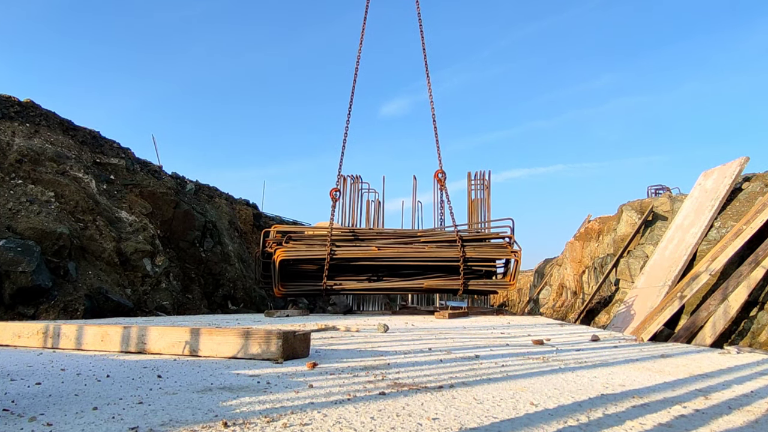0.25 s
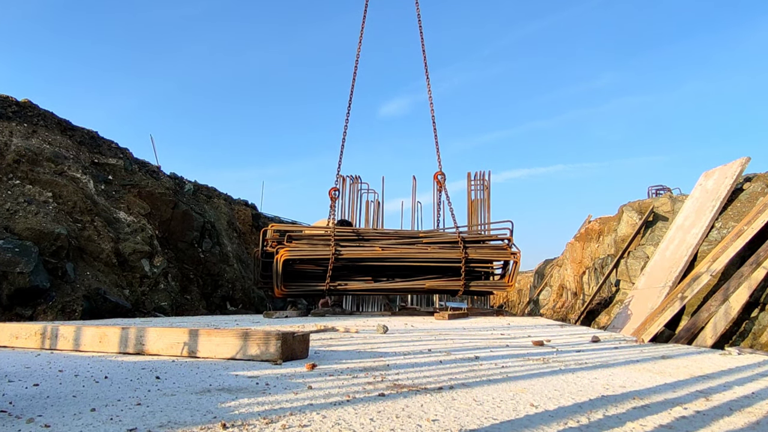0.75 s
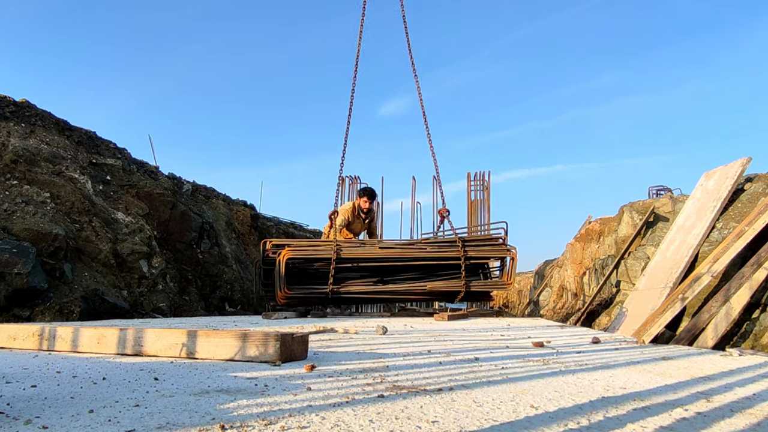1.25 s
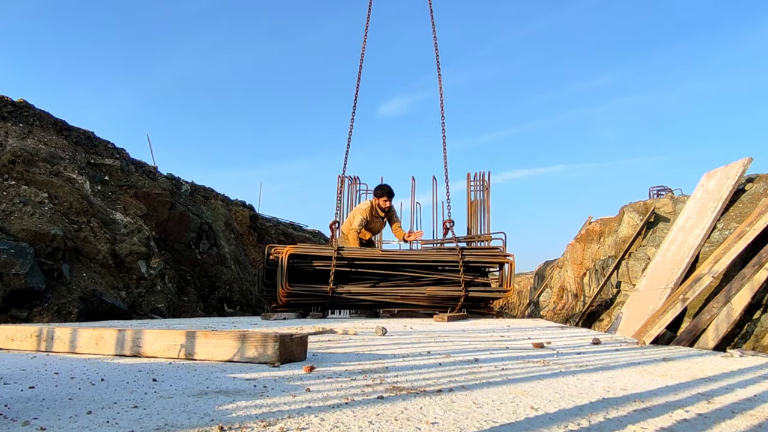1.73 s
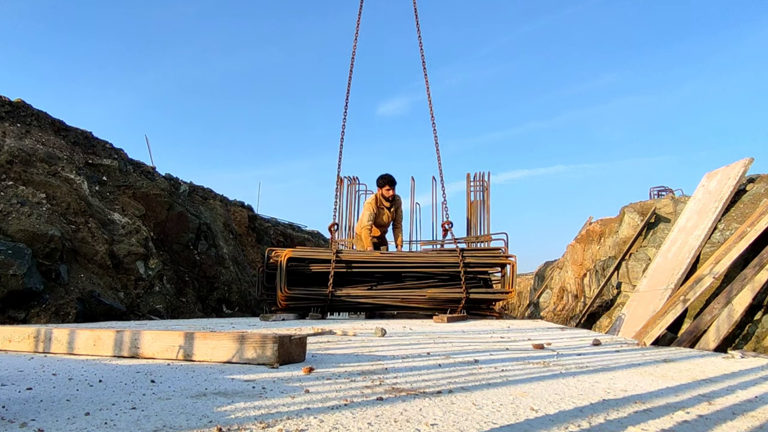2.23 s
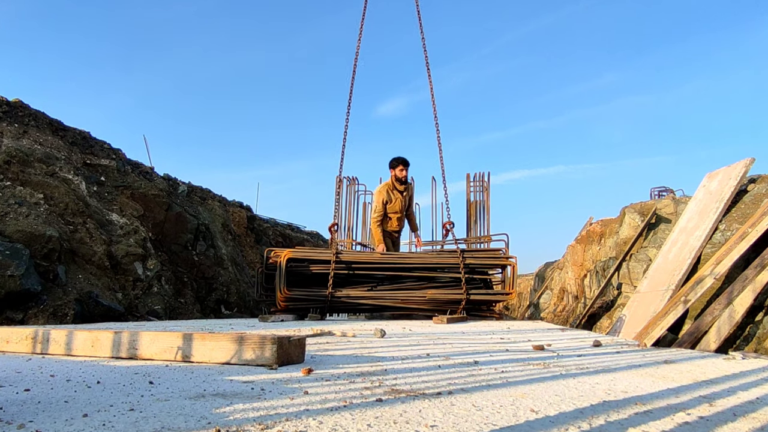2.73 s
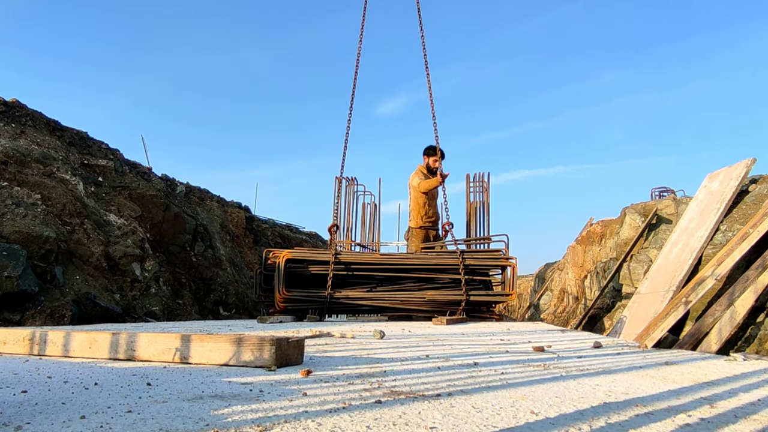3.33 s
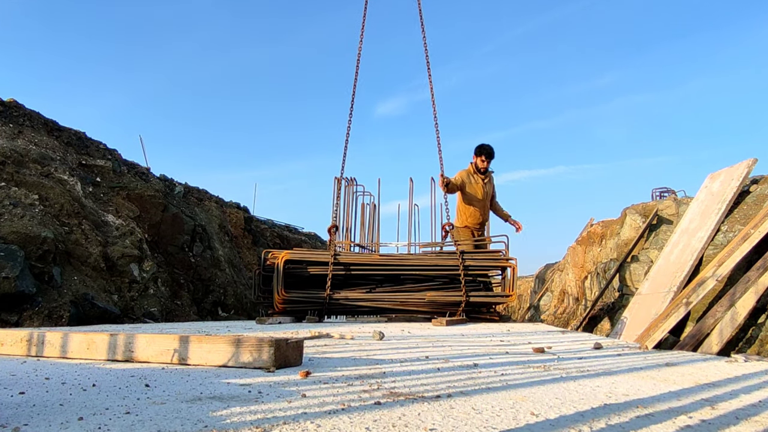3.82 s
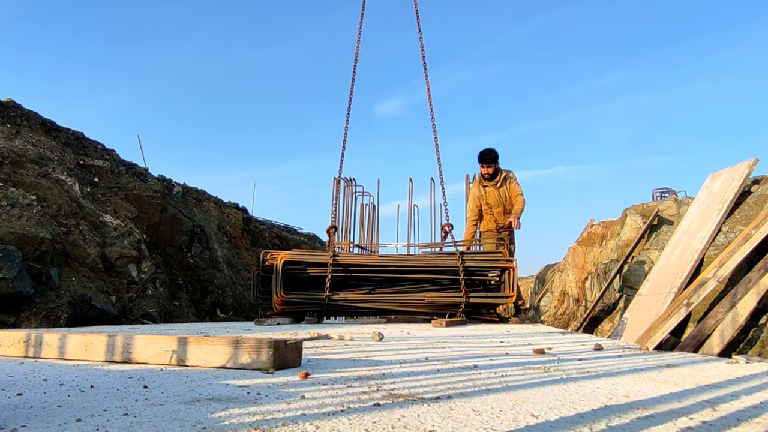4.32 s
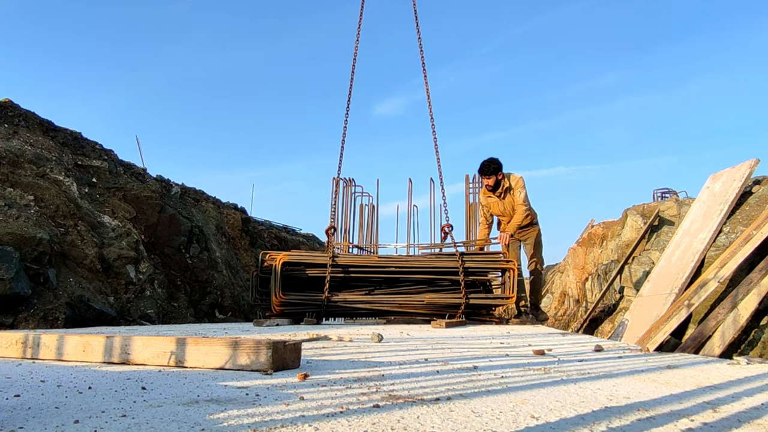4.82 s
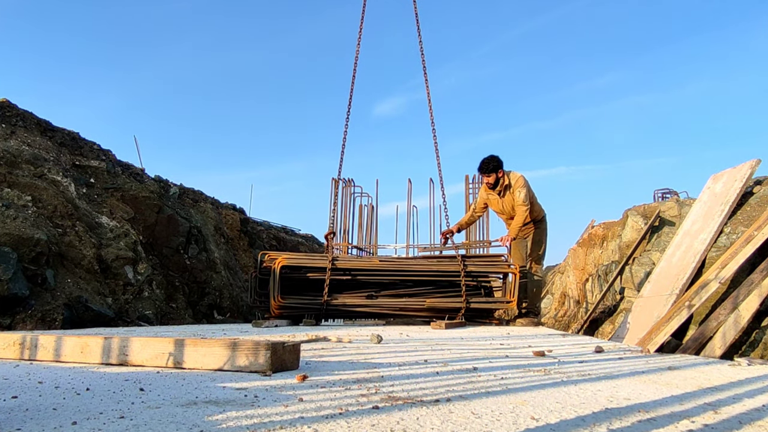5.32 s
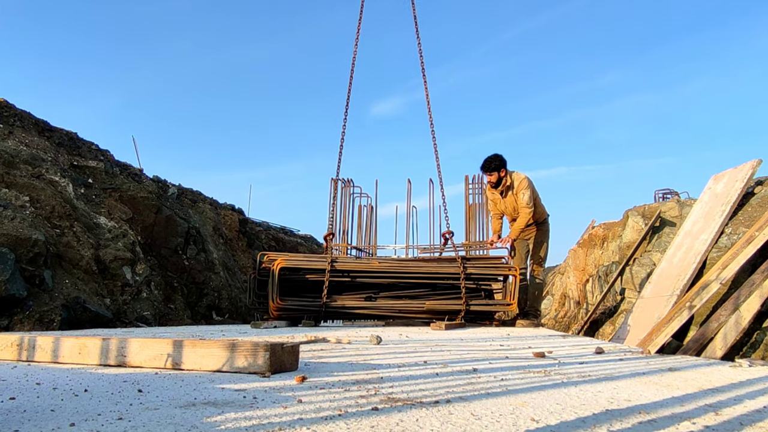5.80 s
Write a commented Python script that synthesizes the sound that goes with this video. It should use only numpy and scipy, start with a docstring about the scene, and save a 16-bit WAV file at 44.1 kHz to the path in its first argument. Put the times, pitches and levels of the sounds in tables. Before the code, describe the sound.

Open construction site, heard in stereo from a short distance: diesels idle low, slightly left, over a soft wash. A few faint chain clinks, then a load of steel bars clatters down for about a second, loud, bright and ringing, with dull wooden knocks beneath and a low puff bumping the microphone. Slack chains clink and slide sparsely, a far hammer tocks regularly, an engine revs briefly, and a few duller steel knocks close it.

```python
"""A bundle of reinforcing bars, set down by crane on a concrete slab ahead of the microphones: struck and
rattling steel is dense noise-like ringing with clear pings; timber bearers knock under it as damped sines.
The slack lifting chains clink and slide as they are handled, in link modes and random light touches.
Slightly left, two diesels idle and a third revs, as exhaust harmonics over a wash of coloured noise.
Far off someone hammers a board; a puff of air bumps the microphone as the load lands."""
import sys
import numpy as np
from scipy import signal
from scipy.fft import rfft, irfft
from scipy.io import wavfile
from scipy.ndimage import uniform_filter1d

SR = 44100
rng = np.random.default_rng(int(sys.argv[2]) if len(sys.argv) > 2 else 0)


def int16_out(signal):
    """Quantize to a 16-bit WAV file."""
    q = np.round(np.clip(np.atleast_2d(signal).T, -1, 1) * 32767)
    wavfile.write(sys.argv[1], SR, q.astype(np.int16))


N = 266937
T = np.arange(N) / SR

# how hard the bars rattle while the weight comes off the chains: (time [s], level [dB])
RATTLE_CURVE = [(1.1, -22), (1.118, -19), (1.195, -26), (1.235, -25.5), (1.27, -22), (1.31, -21.5),
                (1.42, -18.5), (1.468, -21.5), (1.5, -18.5), (1.58, -18.5), (1.68, -21.5), (1.73, -31),
                (1.825, -29.5), (1.885, -23.5), (1.988, -39.5), (2.02, -24.5), (2.05, -30.5),
                (2.085, -28.5), (2.2, -38)]
# heavy blows on the bars, from other bars or a falling chain: (time [s], nominal level [dB], crash t60 [s],
# hardness [dB], left-right difference [dB], relative body [dB], ping pitch [Hz])
SLAMS = [(1.084, -34, 0.12, 1, -2, 9, 8400), (1.101, -19, 0.07, 11.5, 2, -1, 5260),
         (1.1121, -8, 0.081, -1, 0, -2, 6670), (1.1325, -12, 0.065, 2.5, 0, 5, 6460),
         (1.146, -12, 0.13, 0.5, 0.5, 1, 6370), (1.214, -23, 0.089, -5, -2, 0, 7350),
         (1.246, -18, 0.13, 0, 0, -1.5, 6960), (1.269, -16.5, .1, 1, 2, 2.5, 4500),
         (1.294, -8.5, 0.1, -4, 3, -6, 6400), (1.304, -7, 0.067, -2, 0, -3, 7570),
         (1.349, -15, 0.078, -2, 0, -10, 6600), (1.3843, -10.5, 0.088, -1, -1, -8.5, 6260),
         (1.395, -15, .07, -9, 2, -3, 6960), (1.405, -15.5, 0.11, 3, -1, 11, 3940),
         (1.437, -15.5, 0.18, -10, -6, 3.5, 6740), (1.4753, -15, 0.096, 3, -4, -11, 7100),
         (1.499, -13.5, .09, 0.5, 0, 5.5, 2460), (1.5214, -12.5, 0.095, 3, -1.5, 1.5, 6900),
         (1.529, -10, 0.17, 4, -4.5, 2.5, 4430), (1.551, -13, 0.18, -10.5, 0, 7.5, 5200),
         (1.578, -10.5, 0.12, -5.5, -2.5, 4, 7000), (1.608, -10, 0.12, -3, -3, -0.5, 7340),
         (1.6203, -6, 0.19, -4.5, -2, -0.5, 7300), (1.6385, -7, 0.062, -2, -0.5, 4, 4830),
         (1.646, -14, 0.067, 5, 2, 4, 7350), (1.673, -7, 0.09, 4.5, -3.5, -6, 7360),
         (1.6826, -10, 0.039, 5, -1, -1, 7460), (1.739, -20, .07, -1, 0, -4.5, 6300),
         (1.76, -20.5, .04, -3, -7, -6, 7200), (1.837, -16.5, 0.076, -5.5, 2.5, -0.5, 7600),
         (1.868, -20, 0.035, -1.5, 2, -1.5, 6500), (1.884, -8.5, 0.093, 7.5, 0.5, -3, 6900),
         (2.0002, -8.5, 0.083, -1.5, 0.5, -2, 6170), (2.064, -24.5, .16, 6, -1, 2, 7800),
         (5.47, -27.5, 0.16, -7, 0, 4.5, 3680), (5.4923, -28.5, 0.24, -10, 0, 4, 4440),
         (5.517, -15.5, 0.13, -3, 0.5, 0, 6140), (5.5647, -23, 0.089, -1, 0, 4, 6900),
         (5.817, -26, 0.15, -12, -1, 0, 3920), (5.853, -28, 0.17, -4, 0, 0, 6160)]
# single chain links knocking on each other: (time [s], nominal level [dB], crash t60 [s], hardness [dB],
# ping pitch [Hz], ping above that level [dB])
CLINKS = [(0.0553, -45, 0.074, 5, 7840, -8), (0.116, -40, 0.026, 10, 8570, 1),
          (.4283, -55, .08, 12, 5000, -12), (2.168, -36, .04, 0, 6000, -8),
          (2.1861, -27.5, 0.025, 0, 8730, 6), (2.216, -30, 0.064, -5, 7150, -11),
          (2.2845, -34, 0.048, 9, 7030, -6), (2.308, -32, 0.093, -2, 5450, -11),
          (2.3285, -26.5, 0.075, 8.5, 7670, -5), (2.5116, -38.5, 0.088, 5, 5800, -6),
          (2.534, -37.5, 0.09, 7, 8640, -7), (2.575, -39.5, .1, 13, 8650, -1),
          (2.603, -32.5, 0.13, -5, 3300, -11), (2.83, -26.5, 0.067, 3, 5640, 1),
          (2.878, -27.5, .1, -14, 4900, -13), (2.963, -50, 0.072, -8, 5700, 6),
          (3.075, -47, .025, 2, 8500, -5), (3.0907, -38.5, .04, 5, 8550, -8),
          (3.134, -40, .03, 8, 8600, -2), (3.145, -40, 0.13, 9, 8530, 6), (3.214, -35.5, 0.11, 4, 6600, -6),
          (3.253, -34, 0.1, 2, 5650, -3.5), (3.3242, -35.5, 0.097, 8, 8600, 1),
          (3.3696, -42.5, 0.091, 7, 5660, -0.5), (3.459, -47.5, .08, -4, 7070, -3),
          (3.5813, -33, .06, -15, 6730, -2), (3.5976, -34, .06, -14, 5750, -7),
          (3.611, -29, 0.071, -14, 6300, -7), (3.7783, -49, 0.13, -10, 5140, -12),
          (3.8985, -48, .035, 6, 5670, -7), (3.991, -44, .06, -3, 6600, 0), (4.011, -44, .06, 0, 6100, 0),
          (4.046, -37, 0.085, -7, 7560, -6), (4.181, -44, 0.09, 1, 4250, -9),
          (4.842, -44, 0.04, -8, 5220, 11), (4.842, -44.5, 0.077, -8, 4200, 1),
          (4.881, -44.5, .04, 6, 8550, -9), (5.4246, -30, 0.073, -10, 4500, -13),
          (5.6027, -31.5, 0.11, -14, 4400, -14), (5.6443, -26.5, 0.13, -18, 5800, -13),
          (5.667, -34.5, 0.07, -13, 2190, -3), (5.739, -42, 0.15, -12, 7150, -3),
          (6.0148, -37, 0.22, -17, 7330, -12)]
# pulls that draw the slack chain over the bars: (time [s], length [s], relative jingle of the links [dB],
# relative ring of the bars [dB])
CHAIN_PULLS = [(0.424, 0.075, -56, -57), (2.16, 0.061, -44.5, -45.5), (2.302, 0.064, -42, -45.5),
               (2.522, 0.12, -49, -50.5), (2.72, 0.11, -56.5, -55), (2.817, 0.082, -49.5, -50),
               (3.055, 0.37, -56, -59), (3.455, 0.091, -61, -61), (3.582, 0.019, -57, -55),
               (3.996, 0.041, -49.5, -61), (5.251, 0.047, -59, -72), (5.483, 0.17, -48, -42.5),
               (5.823, 0.05, -43.5, -42)]
# far hammer blows: (time [s], relative level [dB], pitch [Hz])
HAMMER_BLOWS = [(0.9485, -33, 2030), (2.4232, -38, 1340), (3.021, -35, 1480), (3.6301, -30.5, 1440),
                (4.2378, -32.5, 1430), (4.8503, -32, 1488)]
# air bumping the microphone, before filtering: (time [s], relative level [dB], rise [s], t60 [s])
AIR_PUFFS = [(1.671, 1, 0.017, 0.16), (1.781, -12.5, 0.006, 1)]
# the load bumping on its timber bearers: (time [s], relative level [dB], pitch [Hz],
# crunch above that level [dB])
THUDS = [(1.11, -18.5, 408, -13), (1.15, -20.5, 399.5, -3), (1.19, -27.5, 400, -9), (1.335, -24, 407, -15),
         (1.385, -19, 405, -10.5), (1.43, -20.5, 388.5, -7.5), (1.529, -27, 258, -6),
         (1.611, -23, 407, -8.5), (1.646, -28, 593, -2), (1.678, -27.5, 491, 8), (1.884, -33.5, 488, -1.5)]

# nominal modes of a chain link: (pitch [Hz], level [dB], longest t60 [s])
LINK_MODES = [(3370, -7.5, 0.16), (3960, -3, 0.29), (4960, -16, 0.2), (5670, 4.5, 0.19), (6060, -3.5, 0.13),
              (7360, 7, 0.16), (8680, 10.5, 0.1), (11400, -12.5, 0.12)]
# modes of the hammered board: (multiple of the blow's pitch, level [dB], t60 [s])
BOARD_MODES = [(.71, -6, 0.061), (.93, -19, 0.027), (1, 2.5, 0.032), (1.08, 1, 0.024), (1.3, -24, 0.018),
               (1.75, -9.5, 0.028)]
# modes of the bearers, whose pitch shifts with the load: (multiple of the pitch, level [dB], t60 [s])
TIMBER_MODES = [(.52, -0.5, 0.093), (.88, -6.5, 0.13), (1, 3, 0.13), (1.57, -10, 0.14), (1.82, -3.5, 0.16),
                (1.98, -10, 0.3), (2.23, -5.5, 0.13), (2.52, -6, 0.13)]

# spectrum of the ringing bars: (frequency [Hz], relative density [dB per Hz])
STEEL_SPECTRUM = [(530, -18), (900, -12.5), (1250, -8), (1390, -6.5), (1800, -6), (2000, -3.5),
                  (2250, -2.5), (4570, -2.5), (5510, -2), (7320, 1), (8730, -4.5), (9590, -13.5),
                  (13300, -13.5), (14300, -30.5), (15000, -40)]
# spectrum of the flexing bundle: (frequency [Hz], relative density [dB per Hz])
FLEX_SPECTRUM = [(120, -7.5), (200, -5.5), (400, 0), (650, -1.5), (1000, -3.5), (1500, -19), (2500, -27.5)]
# spectrum of the wash over the site, before filtering: (frequency [Hz], relative density [dB per Hz])
SITE_SPECTRUM = [(12, -35), (20, 9.5), (47, -1.5), (87, -9), (103, -10), (160, -13.5), (223, -17.5),
                 (270, -18.5), (377, -21.5), (497, -23), (889, -23.5), (1140, -25), (1600, -32.5),
                 (2400, -37), (3400, -45.5), (4700, -52.5), (7400, -50), (9000, -51), (9800, -59),
                 (13400, -57.5), (15000, -80.5)]
# left-right likeness of the wash: (frequency [Hz], shared power [0-1])
SITE_LIKENESS = [(60, 0.95), (200, 1), (500, 1), (1200, 0.84), (2500, 0.3), (6000, 0.2)]

# exhaust tones of the idling crane engine: (multiple of the cycle rate, nominal level [dB rms])
CRANE_ORDERS = [(4, -49.5), (5, -63), (6, -50.5), (7, -40), (8, -46), (12, -47), (18, -49.5), (24, -55),
                (30, -69.5)]
# exhaust tones of the idling generator: (multiple of the cycle rate, nominal level [dB rms])
GENERATOR_ORDERS = [(2, -41.5), (3, -53.5), (4, -45.5), (5, -49)]
# exhaust tones of the revving engine: (multiple of its running pitch, relative level [dB])
REV_ORDERS = [(1, 1), (2, -4.5), (3, -2), (4, -29), (6, -18), (8, -17), (9, -15.5)]

CRANE_HZ, GENERATOR_HZ = 6.89, 38.71
SITE_DB = -41.5  # counted on the 300-3000 Hz part of the wash
# one engine revs: its throttle opens, holds and closes; its pitch climbs from idle to a ceiling
REV_START_S, REV_OPEN_S, REV_HOLD_S, REV_CLOSE_S = 4.86, 0.512, 0.17, 0.1
IDLE_HZ, CLIMB_HZ_PER_S, CLIMB_FROM_S, TOP_HZ = 38.3, 23, 4.9, 51.5
REV_DB, REV_WASH_DB = -35, 4.5
REV_ROUGHNESS = 0.18  # depth of the quick wavering, as a fraction
# the machinery dips briefly as the load lands
DIP_S, DIP_WIDTH_S, DIP_DB = 1.73, 0.031, -15

# a harder blow is brighter: dB of dull body and of sharp edge gained per dB above a typical blow
BODY_GROWTH, EDGE_GROWTH = 0.66, 1.25
CRACK_DB, CRACK_T60_S = -5, 0.0057  # the sharp instant of contact at the start of each blow
PULL_RISE_S, PULL_T60_S, BAR_RING_T60_S = 0.0044, 0.23, 0.68

# the bundle flexes in step with the rattle, less once it rests on its bearers
FLEX_DB, RESTING_S, RESTING_FLEX_DB = -20, 1.5, -3.5
# the ribs grate more the harder the bars rattle
GRATE_DB, GRATE_GROWTH, FULL_RATTLE_DB = 1.5, 0.96, -18.5
CLUMPING_DB = 0.3  # uneven level of the contacts
THUD_T60_S = 0.072

# a hollow in the treble of the right microphone, then the upper limit of both
PORT_NOTCH_HZ, PORT_NOTCH_WIDTH_HZ, PORT_NOTCH_DB = 8510, 1400, -15
CUTOFF_HZ = 14300


def from_db(db):
    """Amplitude factor of a level in dB."""
    return 10 ** (np.asarray(db) / 20)


def rms_one(x):
    """Scales a sound to an rms of 1 over all its channels."""
    return x / np.sqrt(np.mean(x ** 2) + 1e-20)


def at_hz(points, hz):
    """Reads a spectrum on a log-frequency axis."""
    point_hz, values = np.array(points).T
    return np.interp(np.log(hz + 1), np.log(point_hz), values)


def decay(t, t60):
    """Falls 60 dB in t60 seconds, or in 1 ms if t60 is shorter."""
    return np.exp(-np.log(1000) * t / max(t60, 1e-3))


def sine(hz, t, phase):
    """A pure tone whose starting phase is given in turns."""
    return np.sin(2 * np.pi * (hz * t + phase))


def drift(rate):
    """Random wander: straight lines between normal draws of spread 1, rate of them per second."""
    knots = rng.standard_normal(int(N / SR * rate) + 2)
    return np.interp(T * rate, np.arange(len(knots)), knots)


def cut(x, hz, kind, order=4):
    """Butterworth filter."""
    sos = signal.butter(order, np.minimum(hz, .45 * SR), kind, fs=SR, output="sos")
    return signal.sosfilt(sos, x + 1e-18)


def add(out, s, sound):
    """Mixes a sound in from time s."""
    at = int(s * SR)
    out[:, at:at + sound.shape[1]] += sound[:, :N - at]


def stereo_noise(spectrum, alike, lag_ms, size):
    """Coloured noise of rms 1; its shared part reaches the right side lag_ms later."""
    hz = np.arange(size // 2 + 1) * SR / size
    shared, left, right = rfft(rng.standard_normal((3, size)))
    share = np.clip(at_hz(alike, hz), 0, 1)
    direct = np.array([shared, shared * np.exp(-2j * np.pi * hz * lag_ms / 1000)])
    both = np.sqrt(share) * direct + np.sqrt(1 - share) * np.array([left, right])
    return rms_one(irfft(both * from_db(at_hz(spectrum, hz)), size))


def engine(hz, orders, wander, flutter_db):
    """Exhaust tones on multiples of the running speed, each wavering in strength."""
    turns = np.cumsum(hz * (1 + wander * drift(4))) / SR
    tones = 0
    for multiple, db in orders:
        strength = np.sqrt(2) * from_db(db + flutter_db * drift(11))
        tones = tones + strength * sine(multiple, turns, rng.random())
    return tones


def machinery():
    """Engine tones, a booming exhaust and a wash, slightly left; the upper wash swells with the revving."""
    throttle_s = REV_START_S + np.cumsum([0, REV_OPEN_S, REV_HOLD_S, REV_CLOSE_S])
    throttle = np.interp(T, throttle_s, [0, 1, 1, 0])
    rev_hz = np.clip(IDLE_HZ + CLIMB_HZ_PER_S * (T - CLIMB_FROM_S), IDLE_HZ, TOP_HZ)
    crane = engine(CRANE_HZ, CRANE_ORDERS, wander=0.0029, flutter_db=-1.0)
    generator = engine(GENERATOR_HZ, GENERATOR_ORDERS, wander=0.002, flutter_db=0.5)
    revving = engine(rev_hz, REV_ORDERS, wander=0.00413, flutter_db=2.0)
    revving = from_db(REV_DB) * throttle ** 2 * revving * (1 + REV_ROUGHNESS * drift(90))
    boom = from_db(-38.5) * rms_one(cut(rng.standard_normal(N), [45.5, 50], "band", order=2))

    wash = stereo_noise(SITE_SPECTRUM, SITE_LIKENESS, lag_ms=0.44, size=N)
    wash = cut(wash / np.std(cut(wash, [300, 3000], "band")), 125, "high", order=1)
    wash = cut(wash, 12000, "low", order=1)
    wash = wash + (from_db(REV_WASH_DB * throttle) - 1) * cut(wash, 277, "high", order=1)

    dip_db = DIP_DB * np.exp(-((T - DIP_S) / DIP_WIDTH_S) ** 2)
    total = crane + generator + revving + boom + wash * from_db(SITE_DB)
    return total * from_db(dip_db) * from_db([[.4], [-.4]])


def steel_modes(size, uneven_db):
    """Long bars have so many close modes that they ring like coloured noise; some clusters are favoured."""
    alike = [(1000, 0.56), (4000, 0.47), (12000, 0.11)]
    ring = stereo_noise(STEEL_SPECTRUM, alike, lag_ms=-0.072, size=size)
    hz = np.arange(size // 2 + 1) * SR / size
    cluster_hz = np.arange(0, SR / 2, 130)
    favour_db = np.interp(hz, cluster_hz, uneven_db * rng.standard_normal(len(cluster_hz)))
    return rms_one(irfft(rfft(ring) * from_db(favour_db), size))


def struck_spot(modes, ping_hz, spot_db):
    """The modes within a few hundred Hz of the ping stand out, giving each blow a colour of its own."""
    size = modes.shape[1]
    hz = np.arange(size // 2 + 1) * SR / size
    nearness = np.exp(-((hz - ping_hz) / 330) ** 2)
    return irfft(rfft(modes) * from_db(spot_db * nearness), size)


def link_ring(t, ping_t60):
    """Modes of a link, a little different each time, struck at another spot and damped with the ping."""
    ring = 0
    for hz, db, ring_s in LINK_MODES:
        strength = from_db(db + rng.uniform(-6, 4, (2, 1)))
        tone = sine(hz * rng.normal(1, .009), t, rng.random((2, 1)))
        ring = ring + strength * decay(t, min(ring_s, ping_t60 * 2)) * tone
    return ring


def blow(force_db, hardness_db, t60, ping_hz, rise_s, tail_db, tail_t60, link_db, clang_db,
         body_db, edge_db, ping_db, ping_t60, spot_db):
    """Steel on steel: a short crash, a ping from the struck spot, a longer ring and chain-link modes."""
    t = T[:SR // 2]
    modes = struck_spot(steel_modes(len(t), uneven_db=4.2), ping_hz, spot_db)
    body = from_db(body_db + BODY_GROWTH * force_db) * rms_one(cut(modes, 3600, "low"))
    clang = from_db(clang_db + force_db) * rms_one(cut(modes, [4000, 9000], "band"))
    edge_level = from_db(edge_db + EDGE_GROWTH * force_db + hardness_db)
    edge = edge_level * rms_one(cut(modes, 8400, "high"))
    tail = from_db(tail_db) * decay(t, tail_t60)
    crack = from_db(CRACK_DB) * decay(t, CRACK_T60_S)
    crash = (body + clang + edge) * (decay(t, t60) + tail + crack)
    # the ping's phase differs between the two sides
    phase = rng.random() + rng.random((2, 1)) / 2
    ping = from_db(ping_db) * decay(t, ping_t60) * sine(ping_hz, t, phase)
    ringing = from_db(force_db) * (ping + from_db(link_db) * link_ring(t, ping_t60))
    return (crash + ringing) * (1 - np.exp(-t / rise_s))


def clinks(typical_db):
    """Quiet knocks of single links, each with a clear ping that dies in proportion to its crash."""
    out = np.zeros((2, N))
    for s, db, t60, hardness_db, ping_hz, ping_db in CLINKS:
        sound = blow(db - typical_db, hardness_db, t60, ping_hz, rise_s=0.0005, tail_db=-7.5,
                     tail_t60=3.5 * t60, link_db=-18.5, clang_db=-9.5, body_db=-12.5, edge_db=-18.5,
                     ping_db=ping_db, ping_t60=0.88 * t60, spot_db=2)
        add(out, s, sound * from_db(typical_db))
    return out


def rattle(moving, per_s, snap_db, ring_db, t60, colour_db):
    """Random contacts of moving steel: a tick, the ring of one of 12 bars and three clear partials each."""
    t, out = T[:SR // 8], np.zeros((2, N + SR))
    bars = [steel_modes(SR // 2, colour_db) for _ in range(12)]
    ring_shape = decay(t, t60)
    snap_shape = ring_shape + from_db(snap_db) * decay(t, .004)
    for at in np.flatnonzero((rng.random(N) < per_s / SR) & moving):
        modes, spot = bars[rng.integers(len(bars))], rng.integers(SR // 4)
        partial_hz = rng.uniform([[1900], [3800], [6300]], [[3800], [6300], [8900]])
        partials = rng.standard_normal((2, 3)) @ sine(partial_hz, t, 0)
        contact = modes[:, spot:spot + len(t)] * snap_shape + from_db(ring_db) * partials * ring_shape
        out[:, at:at + len(t)] += from_db(rng.uniform(-14, 0)) * contact
    out = out[:, :N]
    # evened out over about 45 ms, so that the caller sets the level
    power = uniform_filter1d(np.mean(out ** 2, axis=0), SR // 22)
    return out / np.sqrt(power + 1e-3)


def pull(s, length_s, t60):
    """Starts quickly, holds and dies away."""
    return np.clip((T - s) / PULL_RISE_S, 0, 1) * decay(np.maximum(T - s - length_s, 0), t60)


def chain_slide():
    """Many light touches of links drawn along; each pull sets bars under them ringing, lower and longer."""
    jingle, bars = 0, np.zeros((2, N))
    for s, length_s, jingle_db, bar_db in CHAIN_PULLS:
        jingle = jingle + from_db(jingle_db) * pull(s, length_s, PULL_T60_S)
        ring = rms_one(cut(steel_modes(SR, uneven_db=1.5), [2100, 5200], "band", order=2))
        add(bars, s, from_db(bar_db) * ring * pull(0, length_s, BAR_RING_T60_S)[:SR])
    links = rattle(T > CHAIN_PULLS[0][0], per_s=90, snap_db=7, ring_db=-5.5, t60=0.17, colour_db=3.5)
    return cut(links, 4500, "high", order=1) * jingle * from_db(4.5) + bars


def hammer(level_db, echo_db, echo_t60):
    """Distant blows on a board: a hollow tock of damped modes, then a faint scatter from the pit's banks."""
    t, out = T[:SR // 4], np.zeros((2, N))
    scatter_shape = decay(t, 0.015) + from_db(echo_db) * decay(t, echo_t60)
    for s, blow_db, hz in HAMMER_BLOWS:
        tock = 0
        for ratio, db, t60 in BOARD_MODES:
            tock = tock + from_db(db) * decay(t, t60) * sine(hz * ratio, t, rng.random())
        spectrum = [(300, -27), (900, -10), (hz, -2), (2200, -16), (7000, -38)]
        scatter = stereo_noise(spectrum, [(500, 0.34), (3000, 0.21)], lag_ms=0.043, size=len(t))
        knock = (tock + scatter * scatter_shape) * (1 - np.exp(-t / 0.0015))
        add(out, s, from_db(blow_db + level_db) * knock)
    return out


def slams(typical_db):
    """Heavy blows somewhere along the bundle, with much body and a ping from the struck spot."""
    out = np.zeros((2, N))
    for s, db, t60, hardness_db, pan_db, body_db, ping_hz in SLAMS:
        sound = blow(db - typical_db, hardness_db, t60, ping_hz, rise_s=0.00084, tail_db=-14.5,
                     tail_t60=0.29, link_db=-26.5, clang_db=-7.0, body_db=body_db - 15.5, edge_db=-16,
                     ping_db=-14.5, ping_t60=0.1, spot_db=2)
        add(out, s, sound * from_db(typical_db + pan_db * np.array([[.5], [-.5]])))
    return out


def bundle():
    """Bars rattle as the weight comes off the chains, ribs grate, and the bundle flexes with a dull crunch."""
    rattle_s, levels_db = np.transpose(RATTLE_CURVE)
    rattle_db = np.interp(T, rattle_s, levels_db)
    flex_db = rattle_db + FLEX_DB + RESTING_FLEX_DB * (T > RESTING_S)
    grate_db = rattle_db + GRATE_DB + GRATE_GROWTH * (rattle_db - FULL_RATTLE_DB)
    touching = np.interp(T, [1.088, 1.102, 2.13, 2.2], [0, 1, 1, 0])
    contacts = rattle(touching > 0, per_s=145, snap_db=3, ring_db=-7, t60=0.22, colour_db=5)
    contacts = contacts * from_db(CLUMPING_DB * drift(70))
    bars = cut(contacts, 8560, "low") * from_db(rattle_db)
    ribs = cut(contacts, 9900, "high") * from_db(grate_db)
    flex = stereo_noise(FLEX_SPECTRUM, [(200, 0.68), (1200, 0.79)], lag_ms=0.12, size=N)
    flex = flex * from_db(flex_db + 2 * drift(60.1))
    return touching * (bars + ribs + flex)


def thuds(ring_db):
    """Short wooden knocks under the weight of the steel; the bearers ring on a little."""
    t, out = T[:SR // 4], np.zeros((2, N))
    for s, thud_db, hz, crunch_db in THUDS:
        # not in order of frequency: the out-of-order point is part of the colour
        spectrum = [(hz / 4, -18), (hz * 0.67, -9), (hz, 0), (hz * 0.78, -7), (hz * 2, -4), (hz * 6, -35)]
        crunch = stereo_noise(spectrum, [(200, 0.68), (1200, 0.59)], lag_ms=0.1, size=len(t))
        crunch = crunch * decay(t, THUD_T60_S)
        ring = 0
        for ratio, db, ring_s in TIMBER_MODES:
            ring = ring + from_db(db) * decay(t, ring_s) * sine(hz * ratio, t, rng.random())
        thud = from_db(crunch_db) * crunch + from_db(ring_db) * ring
        add(out, s, from_db(thud_db) * thud * (1 - np.exp(-t / 0.00198)))
    return out


def puffs():
    """A suction and then a push of air, stronger at the left microphone port, each leaking away."""
    push = 0
    for sign, (s, db, rise_s, t60) in zip((-1, 1), AIR_PUFFS):
        age = np.maximum(T - s, 0)
        push = push + sign * from_db(db) * (1 - np.exp(-age / rise_s)) * decay(age, t60)
    push = cut(push, 69.7, "low", order=2)
    return cut(push, 1.5, "high", order=1) * from_db([[2], [-6]])


def scene():
    """The load and its chains ahead of the microphones, with the noise of the site all round."""
    site = machinery() + hammer(level_db=-0.5, echo_db=-10.5, echo_t60=0.14) + puffs()
    chain = clinks(typical_db=-36.0) + chain_slide()
    load = slams(typical_db=-18.5) + bundle() + thuds(ring_db=-9.5)
    return site + load + chain * from_db([[1], [-1]])


def record(dry):
    """The right port weakens a band of treble; the highest peaks are clipped and the top is cut steeply."""
    left, right = dry
    b, a = signal.iirpeak(PORT_NOTCH_HZ, PORT_NOTCH_HZ / PORT_NOTCH_WIDTH_HZ, fs=SR)
    hollow = signal.lfilter(b, a, right)
    heard = np.array([left, right - (1 - from_db(PORT_NOTCH_DB)) * hollow])
    steep = signal.ellip(10, .3, 80, CUTOFF_HZ, fs=SR, output="sos")
    return signal.sosfilt(steep, np.clip(heard, -.75, .75))


dry = scene()
out = record(dry)
int16_out(out)
```